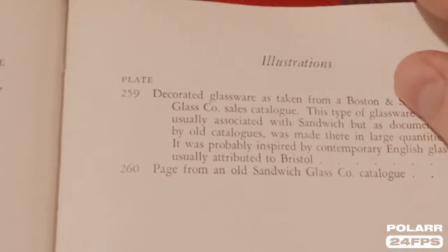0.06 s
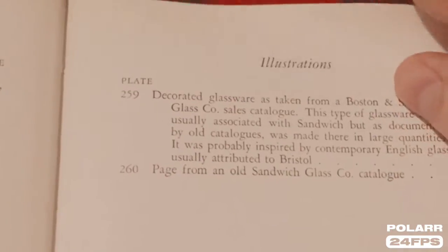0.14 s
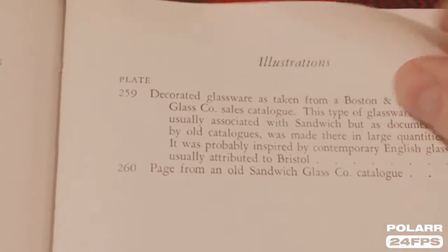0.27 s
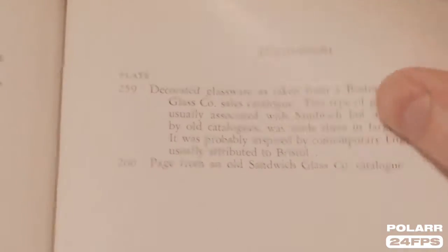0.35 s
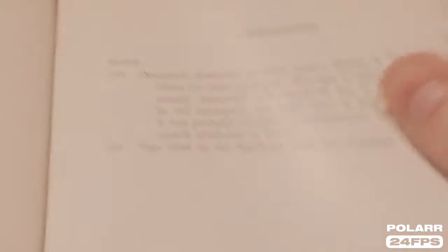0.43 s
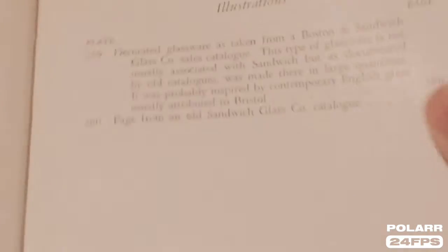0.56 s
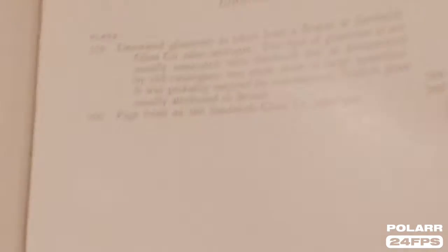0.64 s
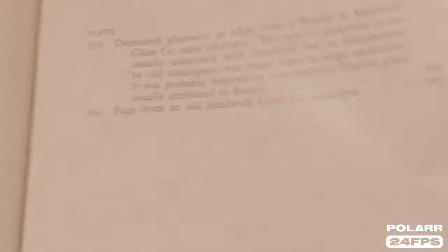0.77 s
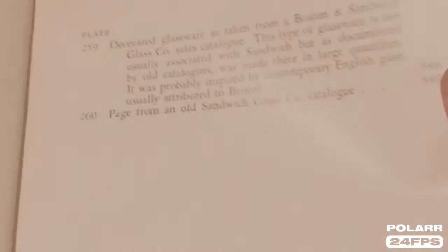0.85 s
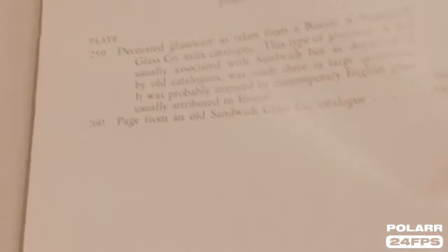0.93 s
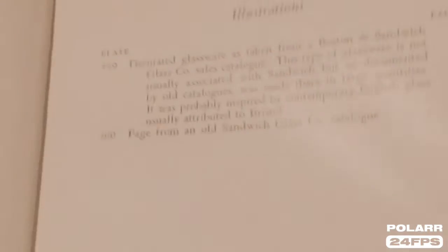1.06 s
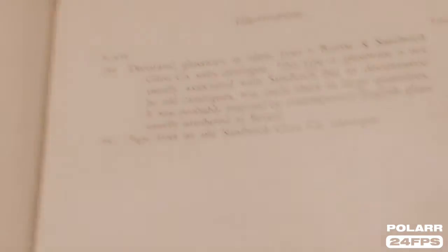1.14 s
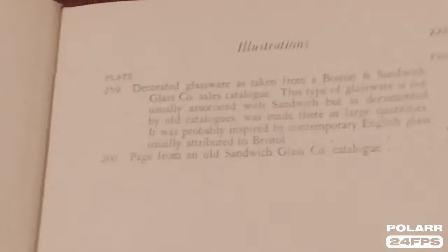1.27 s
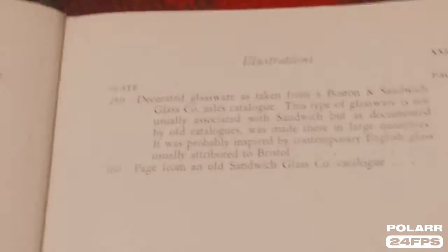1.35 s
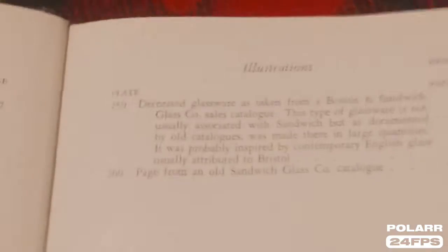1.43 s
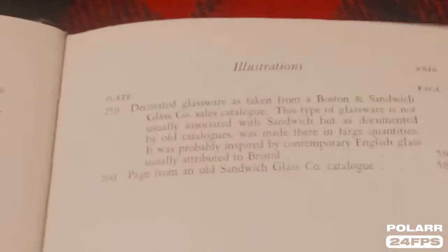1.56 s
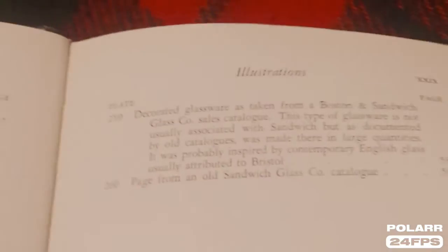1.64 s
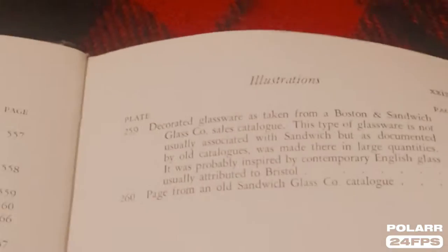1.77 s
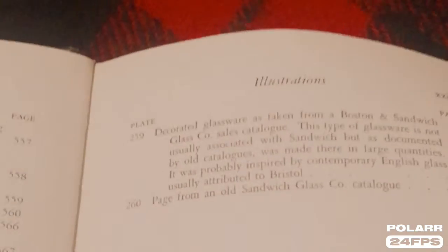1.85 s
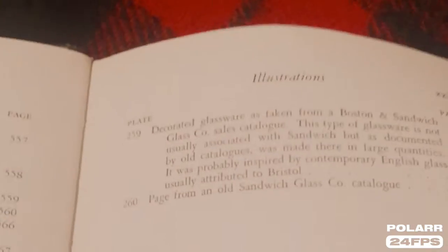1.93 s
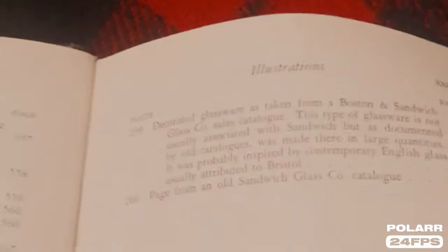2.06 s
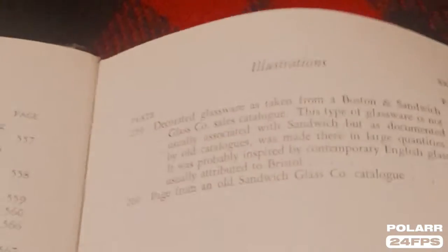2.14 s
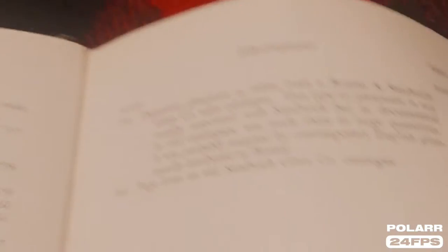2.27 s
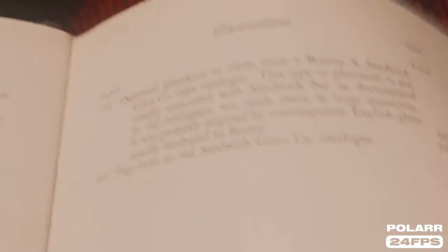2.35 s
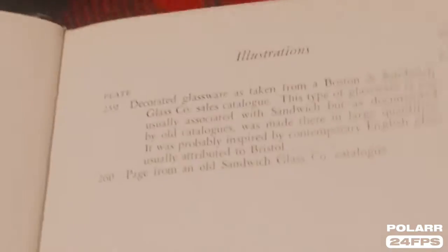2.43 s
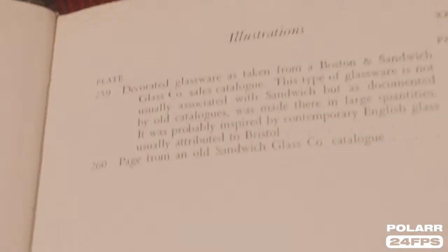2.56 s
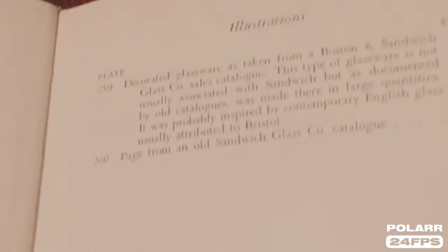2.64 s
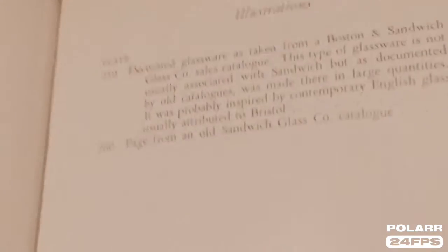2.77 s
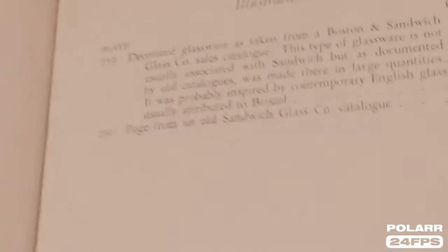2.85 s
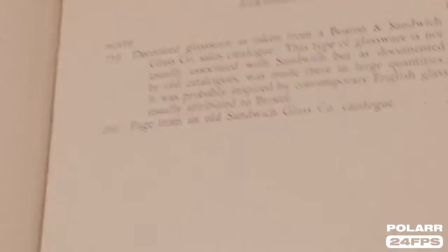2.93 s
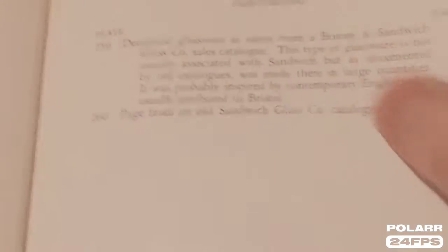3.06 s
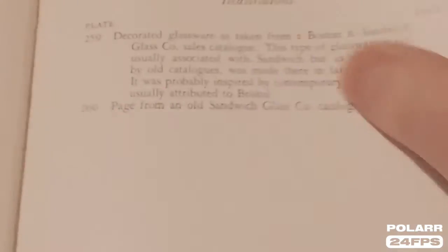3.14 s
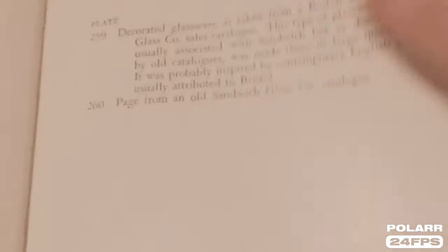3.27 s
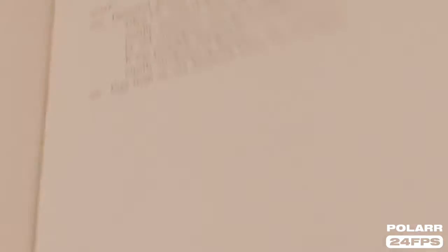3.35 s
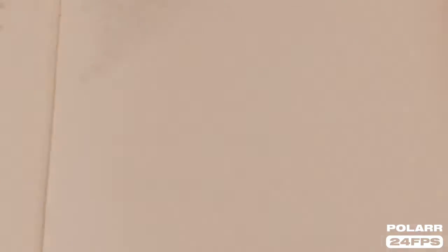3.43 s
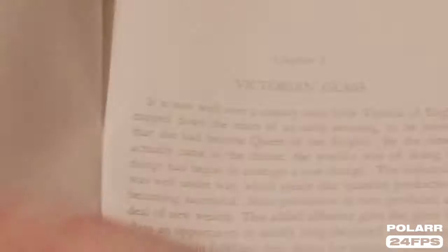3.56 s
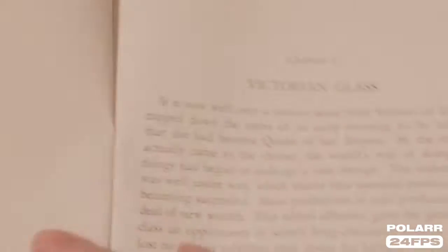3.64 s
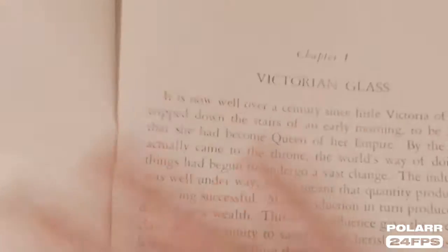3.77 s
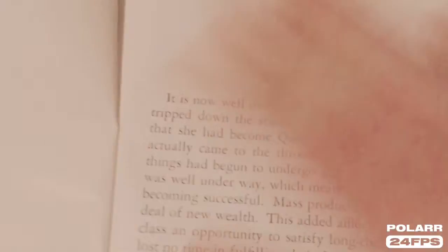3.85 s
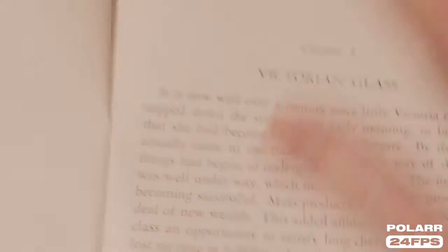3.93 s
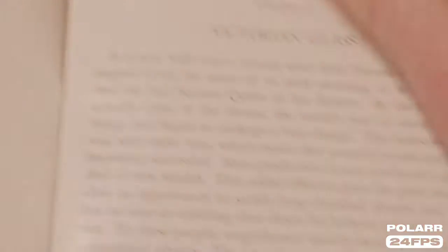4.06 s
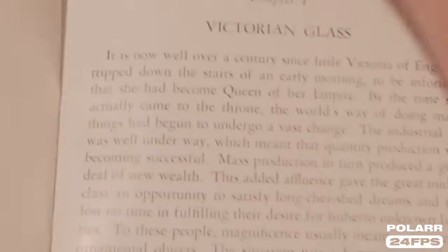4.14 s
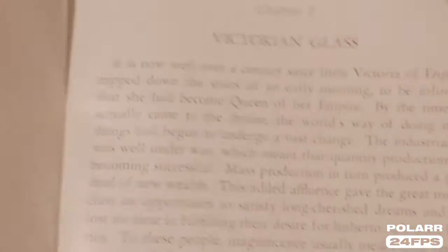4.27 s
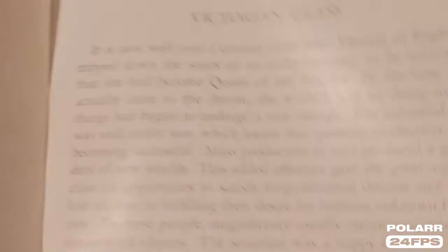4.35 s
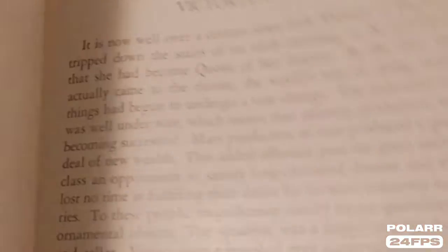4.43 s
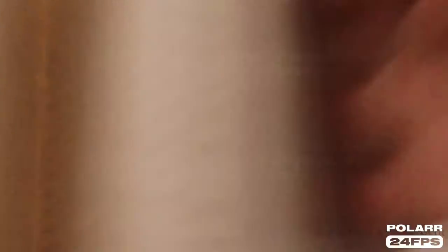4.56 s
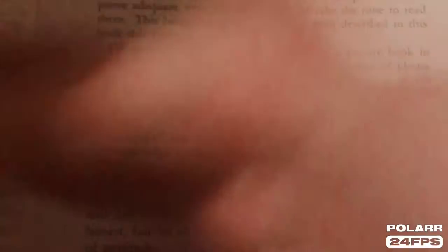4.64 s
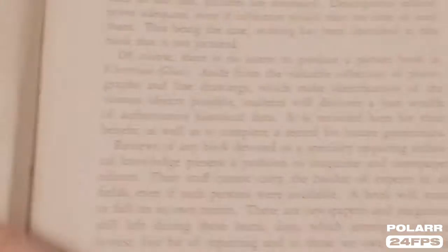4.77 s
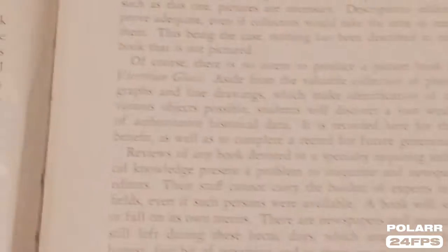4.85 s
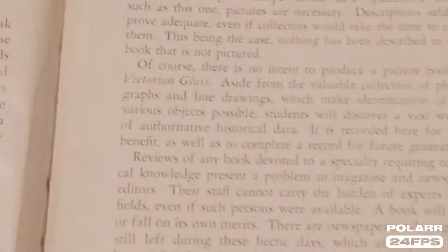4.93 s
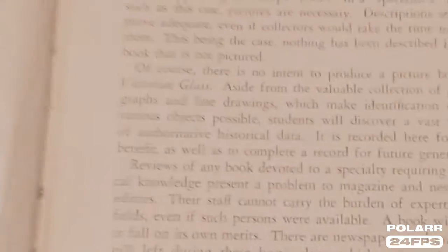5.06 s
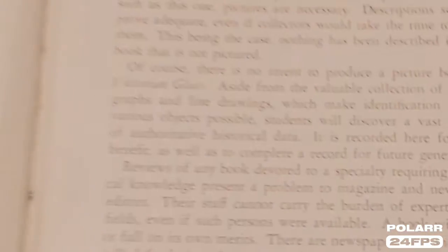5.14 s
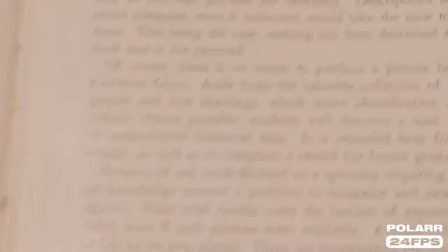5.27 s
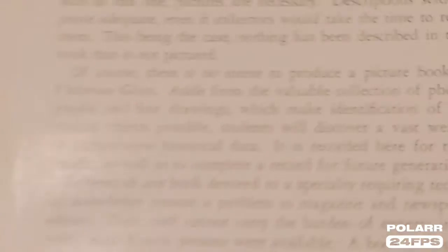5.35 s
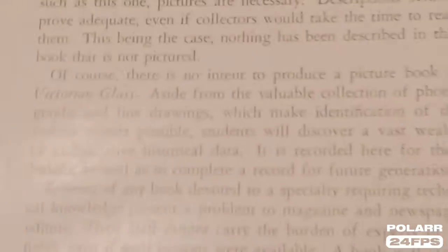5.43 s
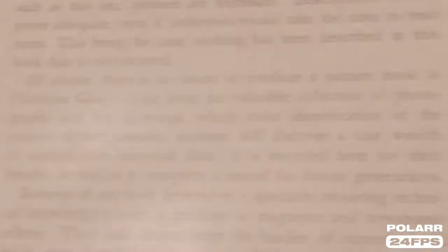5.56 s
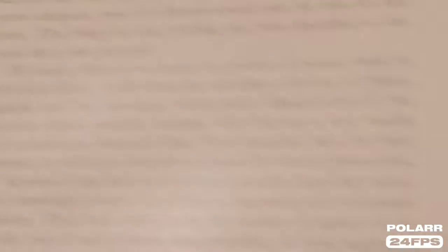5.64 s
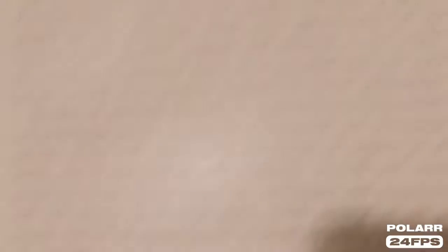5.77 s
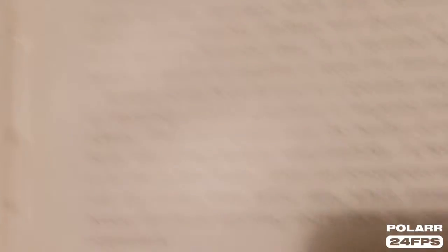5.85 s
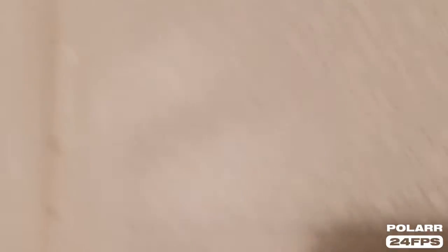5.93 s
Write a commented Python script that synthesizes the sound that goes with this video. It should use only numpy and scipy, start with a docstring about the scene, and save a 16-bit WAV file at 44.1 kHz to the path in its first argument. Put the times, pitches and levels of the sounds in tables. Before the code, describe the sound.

A hand leafs through a book resting on a blanket indoors. Light finger rubs come first, then fluttering page-edge ticks, a calm stretch of faint sliding, and one crisp pop. Turning sheets then rustle and snap in bursts, peaking in a hard crackle, and everything settles into faint rubbing and a low, grainy skin drag. The sound is close, dry and mono, with low bumps from the handheld microphone.

```python
"""First come short, soft scrapes over a faint hiss: fingers slide over the pages of a book on a blanket.
Then page edges flick past a thumb, and turning pages snap; late on, a fingertip drags with a low chatter.
Rubbing, rumble and puffs of air are shaped noise, snaps are bursts of noise, and the chatter is a train of clicks.
The hand's movements rumble in the case of a hand-held phone, whose narrow microphone port lifts one band
and hollows three."""
import sys
import numpy as np
from scipy import signal
from scipy.fft import rfft, irfft
from scipy.io import wavfile
from scipy.ndimage import uniform_filter1d, map_coordinates

SR = 44100
rng = np.random.default_rng(int(sys.argv[2]) if len(sys.argv) > 2 else 0)


def transcribe(signal):
    """Save signal, clipped to [-1, 1], as a 16-bit WAV file at the path in sys.argv[1]."""
    frames = np.atleast_2d(signal).T
    limited = np.clip(frames, -1, 1)
    pcm = np.round(limited * 32767).astype(np.int16)
    wavfile.write(sys.argv[1], SR, pcm)


N = 264600


def amp(db):
    """Turn decibels into a plain multiplier."""
    return 10 ** (np.asarray(db) / 20)


def unit(x):
    """Scale a sound to an average (RMS) strength of 1."""
    return x / np.sqrt(np.mean(x ** 2) + 1e-20)


def curves(rows):
    """Join the rows with straight lines: one value per sample for each column after the time."""
    time_s, *columns = np.transpose(rows)
    return [np.interp(np.arange(N) / SR, time_s, column) for column in columns]


def wobble(knots_per_s):
    """A smooth random curve through random knots."""
    knots = rng.standard_normal(int(N * knots_per_s / SR) + 4)
    return map_coordinates(knots, [np.arange(N) * knots_per_s / SR])


def causal(db_of_hz, size=8192):
    """Build a filter with the given level at each pitch that answers as early as it can (minimum phase)."""
    level = amp(db_of_hz(np.fft.rfftfreq(size, 1 / SR)))
    cepstrum = irfft(np.log(level + 1e-6), size)
    # Folding the second half onto the first removes any answer before the input.
    cepstrum[1:size // 2] *= 2
    cepstrum[size // 2 + 1:] = 0
    return irfft(np.exp(rfft(cepstrum)), size)


def coloured(x, points):
    """Filter x through (pitch_hz, level_db) points, keeping the energy of white noise."""
    pitch_hz, level_db = np.transpose([(1, -120), *points, (SR / 2, -120)])
    kernel = causal(lambda hz: np.interp(np.log(hz + 1), np.log(pitch_hz), level_db))
    return signal.fftconvolve(x, kernel / np.linalg.norm(kernel))[:N]


def rubbing(points, grain_db, patchy_db, bright_hz=None, lift_db=0, width_hz=1):
    """Friction noise: fibres catch in quick uneven grains, with patches over pitch and time."""
    grains = rng.standard_normal(N) * amp(grain_db)
    hz, t, spectrum = signal.stft(grains, SR, nperseg=256)
    frames = np.minimum((t * SR).astype(int), N - 1)
    patches = uniform_filter1d(rng.standard_normal(spectrum.shape), size=3, axis=0)  # smooth over pitch
    patches = uniform_filter1d(patches, size=28, axis=1)  # smooth over time
    spectrum = spectrum * amp((patchy_db * np.ones(N))[frames] * unit(patches))
    if bright_hz is not None:  # the free length of paper sets a broad resonance that moves
        distance = (hz[:, None] - bright_hz[frames]) / width_hz
        spectrum = spectrum * amp(lift_db * np.exp(-distance ** 2))
    return unit(coloured(signal.istft(spectrum, nperseg=256)[1][:N], points))


ROOM_DB, ROOM_FADE_S, ROOM_TOP_HZ = -20.5, 0.052, 2442  # tail level, time to fall 60 dB, treble cutoff


def room(x):
    """A short dull tail from the blanket and nearby walls: fading noise with its treble removed."""
    t = np.arange(SR // 4) / SR
    tail = rng.standard_normal(len(t)) * amp(-60 * t / ROOM_FADE_S) * (t > .004)
    tail = signal.lfilter(*signal.butter(2, ROOM_TOP_HZ, fs=SR), tail)
    return amp(ROOM_DB) * signal.fftconvolve(x, tail / np.linalg.norm(tail))[:N]


# The hand shifts on book and case: peak_s, fall_s (time to fall 10 dB), rumble_db, puff_db.
# A negative fall_s swaps the sides: its size is the rise time, and the fall is the shorter one.
HAND_SHIFTS = [(.12, -0.0003, -65.5, -63), (.32, 0.4058, -56.5, -72.5), (.42, 0.7866, -65, -83),
               (.65, 0.1315, -54.5, -65.5), (.82, 0.0947, -44, -57), (.9, 0.1166, -44, -53),
               (1.05, 0.0754, -52, -58), (1.15, 0.0159, -47, -54.5), (1.32, 0.27, -63, -61.5),
               (1.45, 0.0895, -52, -56), (1.722, 0.0088, -42.5, -52), (1.8, 0.3922, -60.5, -64),
               (2.21, -0.7765, -67, -73.5), (2.329, 0.0131, -43, -41.5), (2.4, -0.2418, -49.5, -65.5),
               (2.6, -0.3818, -60.5, -81.5), (2.76, 0.2967, -58, -77), (2.86, 0.301, -64.5, -65),
               (3.04, 0.0354, -46.5, -49), (3.109, 0.0115, -42, -55.5), (3.32, 0.3067, -55.5, -61),
               (3.39, 0.0383, -58.5, -49.5), (3.481, 0.0758, -40, -49), (3.742, 0.0236, -46.5, -44.5),
               (3.86, 0.0435, -47, -56.5), (3.99, 0.1448, -56.5, -56.5), (4.26, 0.3489, -57.5, -68.5),
               (4.38, 0.0473, -51, -53.5), (4.44, 0.0684, -45, -59), (4.5, 0.0661, -66, -49.5),
               (4.58, 0.0623, -43.5, -54.5), (4.74, 0.095, -57.5, -61), (4.78, 0.06, -57, -82.5),
               (5.11, -0.2062, -54, -63), (5.26, 0.1625, -49, -57.5), (5.52, 0.0125, -48, -52),
               (5.63, -0.0229, -61.5, -50), (5.69, -0.0632, -45.5, -49), (5.78, 0.8881, -56.5, -67),
               (5.87, 0.073, -52.5, -58), (5.97, -0.31, -55, -67.5)]
RISE_SHARE = 0.602  # rise time over fall time
STILL_DB = [-66, -71.5]  # rumble and puff of a still hand


def shifts():
    """Strength of rumble and puff: every shift of the hand swells and dies away."""
    t = np.arange(N) / SR
    power = np.c_[amp(STILL_DB)] ** 2 * np.ones(N)
    for peak_s, fall_s, *layers_db in HAND_SHIFTS:
        falling = (t - peak_s) / fall_s
        rising = (peak_s - t) / (RISE_SHARE * fall_s)
        swell = amp(-10 * np.maximum(falling, rising))
        power += np.outer(amp(layers_db), swell) ** 2
    return np.sqrt(power)


# Tone of the rumble in the case: pitch_hz, level_db
RUMBLE_TONE = [(12, -15.5), (25, -1.5), (45, 0.5), (80, -6), (130, -14.5), (300, -43.5)]
# Tone of the air puffs, also of the thud in a snap: pitch_hz, level_db
PUFF_TONE = [(60, -28), (130, -2), (250, -0.5), (450, -8.5), (800, -13.5), (1500, -28.5)]


def hand():
    """The grip rumbles in lumps; moving pages push puffs of air."""
    rumble_gain, puff_gain = shifts()
    lumps = wobble(11)
    rumble = rubbing(RUMBLE_TONE, 0.68 * lumps, patchy_db=1.0)
    puff = rubbing(PUFF_TONE, 1.0 * lumps + 2.6 * wobble(45), patchy_db=2.5)
    return rumble_gain * rumble + puff_gain * puff


# Fingertip drags, each a list of points: time_s, slips_per_s (before the unevenness), level_db
DRAGS = [
    [(5.155, 206, -67), (5.19, 204, -57), (5.235, 203, -51.5)],
    [(5.25, 60.295, -60), (5.33, 80.32, -60), (5.43, 61.35, -59)],
    [(5.43, 173.7, -53), (5.5, 150.56, -53.5), (5.558, 142.42, -50.5), (5.59, 151.33, -49.5),
     (5.625, 166, -51), (5.66, 167.65, -51), (5.69, 134.51, -51), (5.72, 130.02, -55)],
    [(5.71, 90, -56.5), (5.79, 62.46, -62.5)],
]
# Tone of the skin's slips: pitch_hz, level_db
SKIN_TONE = [(80, -20), (150, 0), (300, -2.5), (600, -14.5), (850, -10.5), (1300, -21), (2000, -33.5)]
STEADY_PER_S = 200  # slips slower than this come ever less evenly


def drag():
    """Skin sticks and lets go at an unsteady rate, with one click of uneven strength per slip."""
    out = np.zeros(N)
    t = np.arange(N) / SR
    for points in DRAGS:
        rate, level_db = curves(points)
        unsteady = np.exp(.04 * (STEADY_PER_S / rate) ** 2 * wobble(50))
        turns = np.cumsum(rate * unsteady) / SR
        slips = np.diff(np.floor(turns), prepend=0)  # one click at each whole turn
        slips = slips * amp(2.165 * rng.standard_normal(N))
        start_s, end_s = points[0][0], points[-1][0]
        touch = np.clip(np.minimum(t - start_s, end_s - t) / 0.00807, 0, 1)  # ramps in seconds
        out += touch * amp(level_db) * unit(coloured(slips - np.mean(slips), SKIN_TONE))
    return out


# Paper snaps: start_s, page_hz (ring pitch), page_db, edge_db, fizz_db, sheen_db, thud_db,
# fade_s (base time to fall 60 dB, scaled for each band). Levels count the energy as spread over 5 ms.
PAPER_SNAPS = [(0.1718, 1720, -48.5, -45, -56.5, -62, -74.5, 0.00668),
               (0.7012, 1770.0, -51.5, -78.5, -61, -71, -57.5, 0.00818),
               (0.7387, 1760, -44, -54.5, -68.5, -76.0, -53, 0.01223),
               (0.7672, 1630.0, -51.5, -56, -69.0, -75.0, -52.5, 0.01686),
               (1.1209, 1650, -40, -70, -72, -73.5, -47, 0.02487),
               (1.1696, 1750.0, -60.5, -55.5, -66, -67, -66, 0.0207),
               (1.377, 1520, -51, -70.5, -70.5, -79.0, -63, 0.00979),
               (1.7167, 1740, -49.5, -64.5, -72.0, -78.0, -56.5, 0.01894),
               (2.3071, 1600, -29, -54.5, -61.5, -62.5, -57.5, 0.01215),
               (2.3137, 1540.0, -51.5, -56, -52.5, -66, -58.5, 0.01206),
               (2.3273, 1470.0, -39.5, -70.5, -64, -65.5, -40.5, 0.02696),
               (2.345, 1240.0, -48.5, -66, -72, -74.0, -47, 0.01637),
               (2.3627, 1560, -51.5, -52.5, -56, -61.5, -45, 0.01706),
               (2.401, 1420.0, -63, -65, -76.0, -98.5, -68.5, 0.01311),
               (2.518, 1700, -58.5, -58.5, -69, -69.5, -64, 0.02098),
               (2.908, 1810.0, -78, -66, -56.5, -74.0, -52, 0.02287),
               (2.9847, 1765, -41.5, -47, -58.5, -63.5, -58, 0.01151),
               (3.3124, 1020, -44.0, -71.5, -69.0, -72.5, -49.5, 0.0267),
               (3.3287, 1730, -44.5, -60.5, -68.5, -70, -50.5, 0.01334),
               (3.3996, 1650, -42.5, -53.5, -60, -63.5, -51.5, 0.01475),
               (3.4298, 2220, -35.5, -46.5, -66, -68.5, -43.5, 0.007697),
               (3.5739, 2190, -43.5, -43, -48, -44, -47, 0.005225),
               (3.5856, 1200.0, -64, -54, -53.5, -60, -47, 0.00908),
               (3.5947, 1450, -52.5, -57.5, -63.0, -64.5, -41, 0.02889),
               (3.7389, 1620, -41, -45, -61, -63, -46, 0.03084),
               (3.764, 1580.0, -37, -48, -65, -68, -53.5, 0.0203),
               (3.7993, 2040, -32.5, -28, -58.5, -57.5, -41.5, 0.021495),
               (3.8258, 2030, -47, -42, -55, -65, -45.5, 0.0148),
               (4.065, 2240, -56.5, -53, -57, -72.5, -70, 0.02164),
               (4.3591, 1990, -49, -45, -55.0, -66, -48, 0.0341),
               (4.3843, 2120, -25.5, -33.5, -54, -63.5, -39, 0.015),
               (4.3875, 1790.0, -26, -47.5, -54.5, -63.5, -45, 0.02712),
               (4.4087, 1580.0, -48, -62.5, -63, -69.5, -42, 0.0186),
               (4.4223, 1930, -20.5, -16, -35, -53.5, -47.5, 0.00905),
               (4.4302, 1730.0, -42.5, -55.5, -56, -76, -38.5, 0.02727),
               (4.5084, 2200, -34.0, -44, -71.5, -76, -46, 0.012106),
               (4.5359, 1380.0, -65.5, -55, -47.5, -56, -45.5, 0.024),
               (4.5519, 1570, -35, -52, -67, -64.5, -48.5, 0.00779),
               (4.5552, 1500, -35.5, -53, -65.5, -67.0, -38.5, 0.00745),
               (4.5677, 1400.0, -69, -62.0, -64, -57, -56.5, 0.00915),
               (4.562, 920.0, -41, -66, -72.0, -70, -62, 0.03894),
               (4.6825, 1570.0, -47.5, -65.5, -76.5, -74.0, -48, 0.013),
               (4.7406, 1250, -52.5, -58.5, -74.5, -78.5, -66, 0.0094),
               (4.756, 2370, -54, -51, -67, -62, -72.0, 0.009126),
               (5.0017, 1910, -57, -63, -76, -75.5, -57, 0.0062),
               (5.0068, 1300.0, -48.5, -66, -68.5, -69.5, -62.5, 0.00474),
               (5.064, 1210.0, -50.5, -62, -62.5, -79.5, -50, 0.005893),
               (5.12, 1299, -61, -71.5, -65.5, -62, -62.5, 0.00585),
               (5.277, 1500, -80, -80, -70.5, -63, -74.5, 0.005253),
               (5.35, 1503, -80, -80, -76.5, -69, -56.5, 0.00623),
               (5.44, 1494, -80, -80, -73.5, -64, -74.5, .006),
               (5.865, 1499, -80, -79, -73.5, -65.5, -74.5, .006),
               (5.905, 1500, -80, -79, -77.5, -68.5, -75, 0.006134),
               (5.161, 1480, -71, -57.5, -53, -56.5, -68.5, 0.0065),
               (5.7026, 1360, -64, -62, -62.5, -61.5, -71, 0.00659),
               (5.848, 900.3, -62.5, -72.5, -80, -80, -57, 0.01175),
               (5.8245, 1000.0, -60, -75, -76, -80.5, -53.5, 0.01119)]
# A thumb lets page edges flick past, all alike but for strength: start_s, strength_db
FLICKS = [(0.7916, -1.5), (0.813, 1.5), (0.841, -3.5), (0.8624, 3), (.885, 0), (.898, -2), (0.9252, -0.5),
          (0.944, 0.5), (0.9834, 0.5), (1.0084, 3.5)]
FLICK_HZ, FLICK_FADE_S = 1638.4, 0.013842  # ring pitch and base fade, as in the snaps
FLICK_DB = [-46.5, -45, -51.5, -58, -51]  # page, edge, fizz, sheen, thud, before the strength is added
# Tones of page edge, fizzing fibres and fine sheen, also used for the fingers: pitch_hz, level_db
EDGE_TONE = [(1800, -19.5), (2700, -6.5), (3500, -4.5), (4100, -0.5), (4600, 0.5), (5300, -17),
             (7000, -16.5)]
FIZZ_TONE = [(3500, -49), (5300, 2), (5800, 0), (6300, -3.5), (6900, -1), (7700, -5), (8800, -3),
             (9600, -3), (10500, -18), (13000, -36.5)]
SHEEN_TONE = [(8000, -32.5), (10500, -1.5), (12500, -1.5), (14500, -4), (16000, -8)]


def snaps():
    """A crease buckles in a burst of tiny cracks, and the sheet rings briefly at its own pitch."""
    t = np.arange(SR // 8) / SR
    fade_scale = np.array([[.95], [1.1], [1.2], [1.1], [1.3]])  # page, edge, fizz, sheen, thud
    bands = np.zeros((5, N + len(t)))
    flicks = [(s, FLICK_HZ, *np.add(FLICK_DB, db), FLICK_FADE_S) for s, db in FLICKS]
    creases = flicks + PAPER_SNAPS
    for start_s, page_hz, *bands_db, fade_s in creases:
        # A dull knock, with little edge beside its page, comes from a soft, slower contact.
        soft = np.clip((bands_db[0] - bands_db[1]) / 22, 0, 1)
        attack = 1 - np.exp(-t / (0.00048 + 0.00045 * soft))
        burst = rng.standard_normal((5, len(t))) * attack * amp(-60 * t / (fade_scale * fade_s))
        burst[:4, SR // 4000] += 3.5 * (1 - soft)  # a crisp snap opens with one sharp jolt
        ring = np.sin(2 * np.pi * page_hz * t) * (1 - np.exp(-t / 0.0002544))
        ring = ring * amp(-60 * t / (0.003856 + 0.0028 * soft))
        burst[0] = signal.fftconvolve(burst[0], ring)[:len(t)]
        burst *= np.sqrt(SR / 200) / np.linalg.norm(burst, axis=1)[:, None]  # energy of 5 ms at strength 1
        first = round(start_s * SR)
        bands[:, first:first + len(t)] += amp(bands_db)[:, None] * burst
    out = bands[0, :N]
    for band, tone in zip(bands[1:], [EDGE_TONE, FIZZ_TONE, SHEEN_TONE, PUFF_TONE]):
        out = out + coloured(band[:N], tone)
    return out


# Fingers sliding on paper: start_s, length_s, drone_db, scrape_db, hiss_db, sheen_db (levels mid-stroke),
# swell_db (change from start to end), drone_hz (brightest drone), hiss_hz (brightest hiss)
FINGER_STROKES = [(0.062, 0.02248, -62.5, -60, -57.5, -64, -1.5, 1694, 6400),
                  (0.111, 0.06526, -56, -51, -50.5, -59, 13, 1772, 6100),
                  (0.184, 0.06154, -69, -61.5, -59.5, -65.5, -2, 2002, 7000),
                  (0.241, 0.09394, -64, -59.5, -57, -65.5, 2, 2003, 6796),
                  (0.403, 0.09654, -66, -65, -62, -68.5, -4.5, 1818, 7097),
                  (0.498, 0.10745, -68.5, -63.5, -63.5, -75, 2, 1858, 7107),
                  (0.636, 0.09039, -61, -59, -60.5, -75, 4.5, 1696, 7888),
                  (0.729, 0.0553, -58, -60.5, -66, -73.5, 0, 1650, 7602),
                  (0.82, 0.0225, -60.5, -61.5, -62, -72, 6, 1690, 7800),
                  (0.874, 0.0864, -64.5, -65, -68.5, -73, 5, 1400, 7786),
                  (0.963, 0.0543, -65.5, -62, -70, -73.5, 5.5, 1700, 7700),
                  (1.007, 0.05661, -61.5, -56.5, -59.5, -67, -7, 1687, 7700),
                  (1.065, 0.17036, -63, -61, -64.5, -70, -7, 1596, 7700),
                  (1.212, 0.2228, -71, -71, -69.5, -71.5, -4, 1405, 7300),
                  (1.444, 0.19253, -61, -68, -68, -75, -3.5, 1614, 6294),
                  (1.626, 0.12116, -55.5, -64, -68, -73.5, -1, 1674, 6000),
                  (1.778, 0.04628, -62.5, -75, -74.5, -77.5, 0.5, 1619, 7800),
                  (1.836, 0.13415, -57, -71.5, -72.5, -78.5, -4.5, 1816, 7795),
                  (1.981, 0.0902, -59.5, -73.5, -74, -82.5, -0.5, 1625, 7196),
                  (2.167, 0.04558, -59.5, -63, -66, -77.5, -6.5, 2132, 7192),
                  (2.27, 0.02349, -41, -43, -44.5, -57.5, 10.5, 1443, 6600),
                  (2.291, 0.09215, -52, -65, -66, -73, -14.5, 1341, 7395),
                  (2.44, 0.08335, -69, -65.5, -62.5, -74.5, 12.5, 1574, 8199),
                  (2.637, 0.13045, -66.5, -62.5, -56.5, -66, -6.5, 1698, 8600),
                  (2.767, 0.1331, -74.5, -73, -66.5, -73, 3.5, 1782, 8700),
                  (2.881, 0.08877, -68.5, -62, -58.5, -63, 4.5, 1749, 8600),
                  (2.96, 0.0688, -61, -56.5, -52, -59.5, 10.5, 1934, 7600),
                  (3.032, 0.10101, -56, -51.5, -52.5, -59, -14.5, 1934, 6997),
                  (3.222, 0.12975, -53.5, -58.5, -62, -71, 1, 1686, 7396),
                  (3.341, 0.05372, -59, -62, -59.5, -64.5, 8, 1517, 7396),
                  (3.39, 0.03104, -45.5, -57.5, -51.5, -64, 4, 1349, 6799),
                  (3.416, 0.1446, -60.5, -57.5, -57, -60.5, -1.5, 1734, 7399),
                  (3.56, 0.02796, -65.5, -57.5, -59, -64, 1.5, 2165, 7601),
                  (3.589, 0.02301, -54, -62, -56, -59.5, -2.5, 1301, 7594),
                  (3.609, 0.12, -73, -56.5, -53, -56, 1, 2272, 6900),
                  (3.735, 0.05308, -46.5, -53.5, -53.5, -61, 5.5, 1660, 6660),
                  (3.791, 0.07208, -54, -53, -55, -61, -14, 1972, 6494),
                  (3.877, 0.01268, -60.5, -56.5, -61, -67, 10, 2182, 7200),
                  (3.971, 0.05087, -63.5, -78, -77.5, -84, -9.5, 1132, 8396),
                  (4.067, 0.03491, -64, -63, -62, -73.5, 3, 1901, 5998),
                  (4.101, 0.06956, -64.5, -53, -54, -67.5, 0.5, 2364, 5601),
                  (4.178, 0.05102, -64.5, -55.5, -57.5, -69, 2.5, 2091, 5997),
                  (4.238, 0.04087, -59, -53.5, -64.5, -68, 3, 2052, 6797),
                  (4.298, 0.05827, -67.5, -61, -71.5, -73.5, 6.5, 1965, 7197),
                  (4.343, 0.06075, -49.5, -54, -56.5, -63.5, 14, 1888, 7705),
                  (4.41, 0.07816, -48, -52, -60, -70.5, -14.5, 1543, 6296),
                  (4.501, 0.09213, -52.5, -66.5, -61.5, -66, -1, 1086, 7795),
                  (4.551, 0.027, -53.5, -66, -66, -70, -6, 900.1, 7700),
                  (4.604, 0.1205, -59, -68, -65.5, -67.5, -13.5, 1455, 7297),
                  (4.72, 0.05, -67.5, -67.5, -68.5, -71.5, -3, 1740, 7407),
                  (4.873, 0.08533, -71.5, -66, -67, -72, 7.5, 1970, 8000),
                  (4.952, 0.1034, -68.5, -63.5, -63, -64, -4.5, 1618, 7700),
                  (5.101, 0.02882, -64.5, -70.5, -73, -73, 1.5, 1377, 7700),
                  (5.146, 0.25, -70, -66, -71, -72, -2.5, 1280, 7808),
                  (5.397, 0.31975, -65, -66.5, -73.5, -71.5, -1, 981.2, 8400)]
# Faint hiss between the strokes: time_s, level_db (before the offsets below)
REST_HISS = [(0, -76), (.1, -76.5), (.3, -68.5), (.75, -70), (.85, -72.5), (1.1, -69.5), (2.1, -73),
             (3.15, -68.5), (3.8, -66.5), (3.9, -74.5), (4.05, -79), (4.3, -64.5), (4.83, -71), (6, -73)]
REST_OFFSET_DB = [0.5, 2, 1, -2.5]  # drone, scrape, hiss, sheen
REST_BRIGHT_HZ = [1700, 7600]  # brightest drone and hiss at rest
# Ramp times: landing = LAND_S + LAND_PER_S * length squared, so long strokes land far more softly;
# lifting = LIFT_S + LIFT_SHARE * length.
LAND_S, LAND_PER_S, LIFT_S, LIFT_SHARE = 0.0022, 1.3, .003, 0.3697


def contact():
    """Strength of four friction layers and their brightest pitches: strokes land, swell or fade, and lift."""
    t = np.arange(N) / SR
    power = amp(curves(REST_HISS)[0] + np.c_[REST_OFFSET_DB]) ** 2
    bright = np.c_[REST_BRIGHT_HZ] * power[::2]  # pitches weighted by the power of drone and hiss
    for start_s, length_s, *layers_db, swell_db, drone_hz, hiss_hz in FINGER_STROKES:
        land_s = LAND_S + LAND_PER_S * length_s ** 2
        lift_s = LIFT_S + LIFT_SHARE * length_s
        first = max(round((start_s - land_s) * SR), 0)
        near = slice(first, round((start_s + length_s + lift_s) * SR))
        since = t[near] - start_s
        touch = np.clip(np.minimum(since / land_s, (length_s - since) / lift_s) + .5, 0, 1)
        swell = amp(swell_db * np.clip(since / length_s - .5, -.5, .5))
        stroke = np.outer(amp(layers_db), touch * swell) ** 2
        power[:, near] += stroke
        bright[:, near] += np.c_[[drone_hz, hiss_hz]] * stroke[::2]
    return np.sqrt(power), bright / power[::2]


# Tone of the page's drone: pitch_hz, level_db
PAGE_TONE = [(500, -38), (900, -4), (1300, -2.5), (1700, -2), (2300, -4.5), (2800, -13), (4000, -26.5)]
SHEEN_RATIO = 1.5  # brightest sheen over brightest hiss


def fingers():
    """One sliding contact drives the page's drone, the scrape of its edge, a hiss and a fine sheen."""
    gains, (drone_hz, hiss_hz) = contact()
    # A light touch is smooth, a firm one rough.
    press = np.clip(np.log10(gains / amp(-73.5)), .15, 1.1)
    catch = 0.78 * wobble(24.915) + 1.4 * wobble(90)  # unevenness shared by all layers
    drone_grain = press[0] * (1.2 * catch + 1.8 * wobble(350))
    drone = rubbing(PAGE_TONE, drone_grain, 3 * press[0], drone_hz, lift_db=6.659, width_hz=640)
    scrape_grain = press[1] * (0.76 * catch + 1.0 * wobble(500))
    scrape = rubbing(EDGE_TONE, scrape_grain, 2.7963 * press[1])
    hiss_grain = press[2] * (0.86 * catch + 1.4 * wobble(700))
    hiss = rubbing(FIZZ_TONE, hiss_grain, 3.9 * press[2], hiss_hz, lift_db=4.756, width_hz=1400)
    sheen_grain = press[3] * (1.3864 * catch + 2.2 * wobble(500))
    sheen_hz = SHEEN_RATIO * hiss_hz
    sheen = rubbing(SHEEN_TONE, sheen_grain, 2.8 * press[3], sheen_hz, lift_db=3, width_hz=1400)
    return np.sum(gains * [drone, scrape, hiss, sheen], axis=0)


def scene():
    """Add all sources together; only the snaps and flicks get a room tail."""
    cracks = snaps()
    return (room(cracks) + hand() + drag() + cracks + fingers())[None]


# Bands lifted (above 0 dB) or hollowed (below 0 dB) by the port: pitch_hz, width_hz, level_db
PORT_BANDS = [(2585, 400, 1), (5282.7, 631, -2.5), (7650, 360, -3), (10687, 200, -6.5)]
TOP_HZ = 15750  # nothing passes from here up


def record(dry):
    """The microphone's narrow port lifts one band and hollows three; the treble stops at a band limit."""
    def port_db(hz):
        return sum(level_db / (1 + ((hz - pitch_hz) / width_hz) ** 2)
                   for pitch_hz, width_hz, level_db in PORT_BANDS)

    heard = signal.fftconvolve(dry[0], causal(port_db))[:N]
    passed = np.fft.rfftfreq(N, 1 / SR) < TOP_HZ
    return irfft(rfft(heard) * passed, N)[None]


dry = scene()
out = record(dry)
transcribe(out)
```